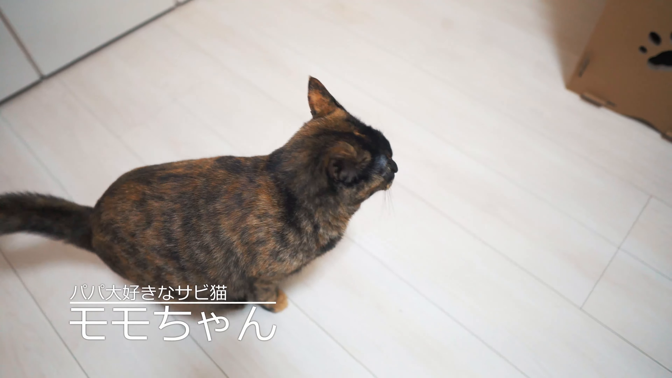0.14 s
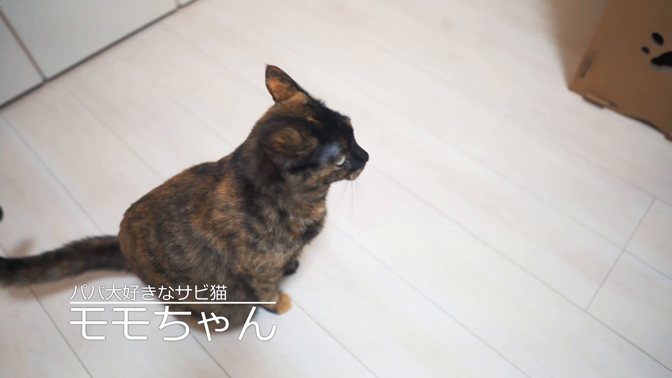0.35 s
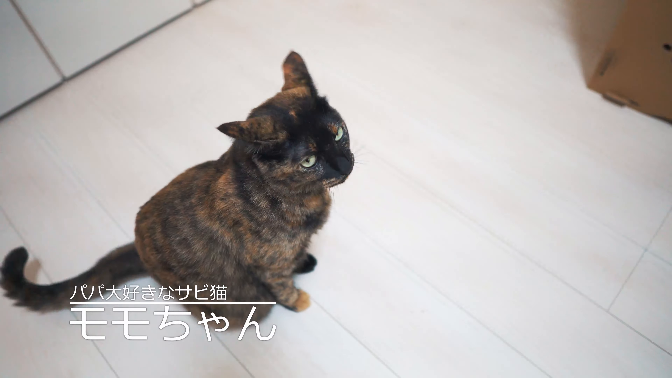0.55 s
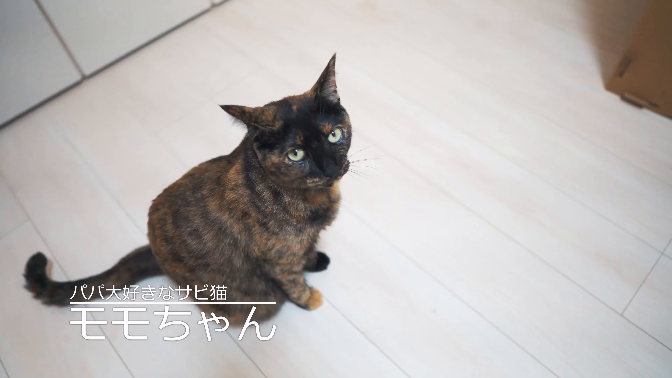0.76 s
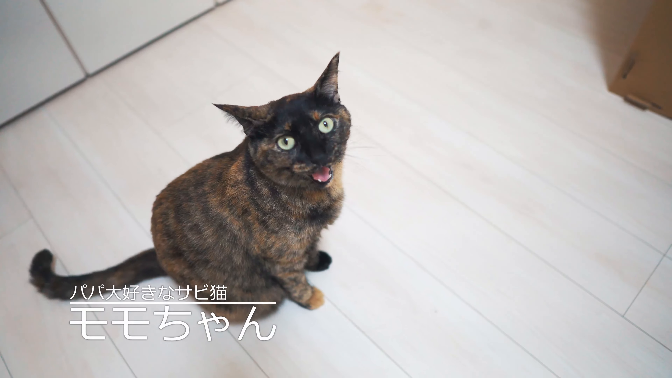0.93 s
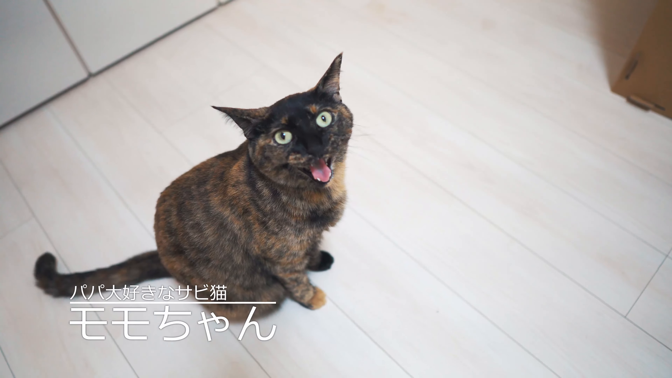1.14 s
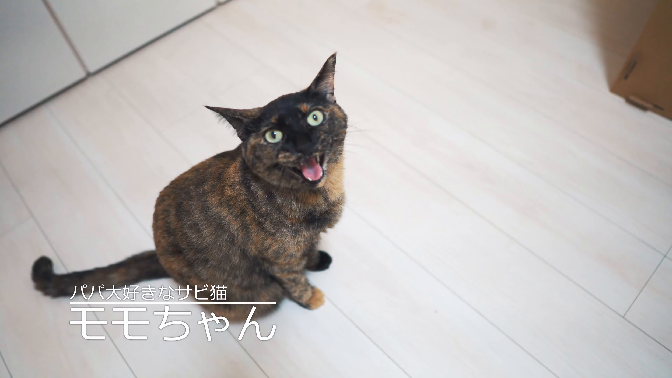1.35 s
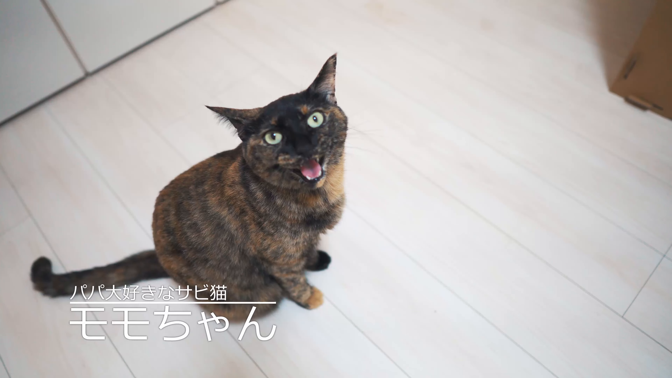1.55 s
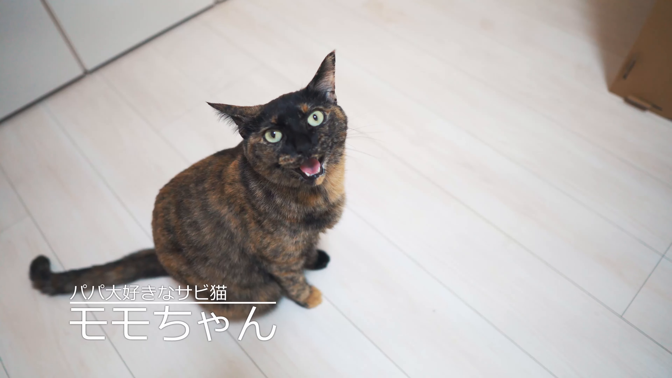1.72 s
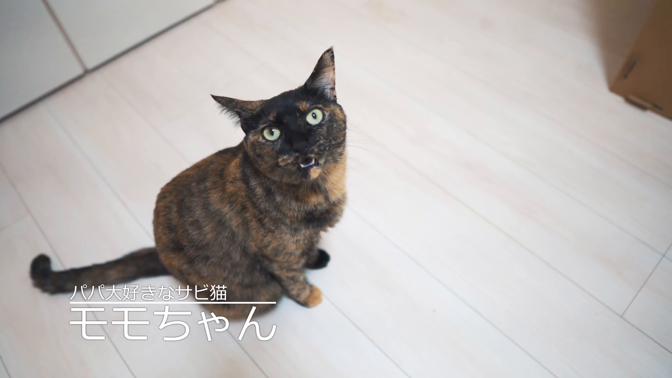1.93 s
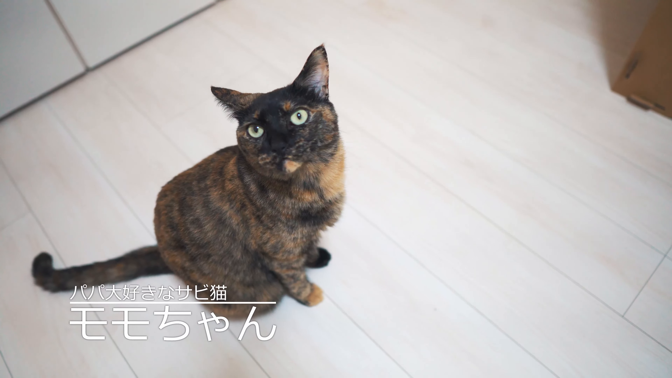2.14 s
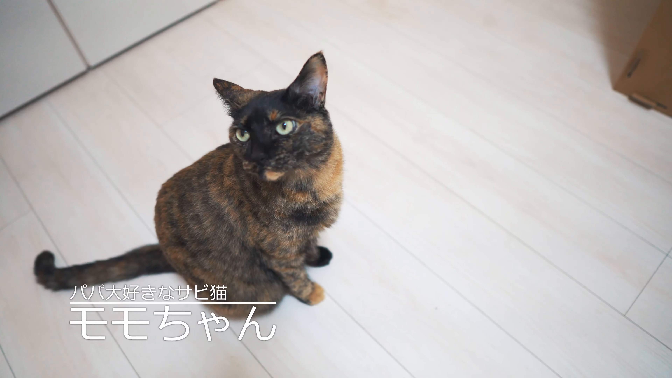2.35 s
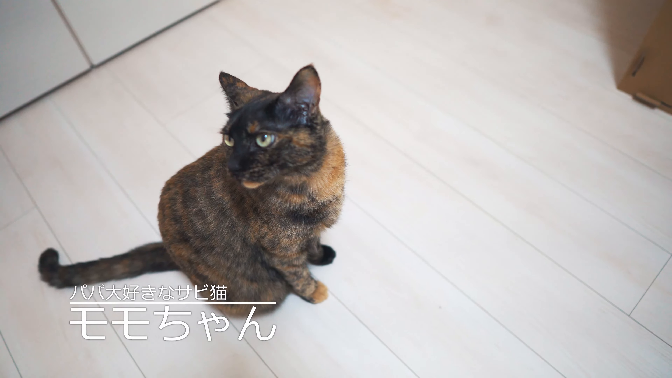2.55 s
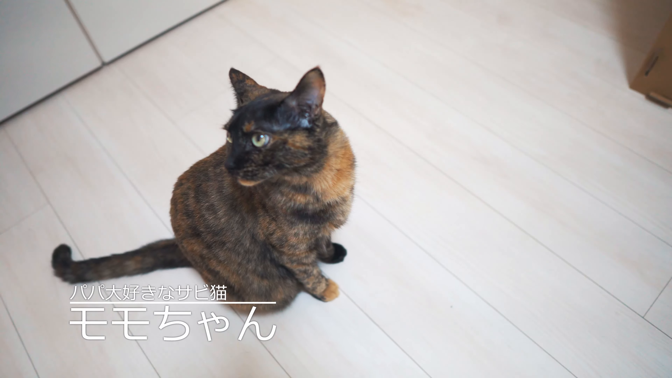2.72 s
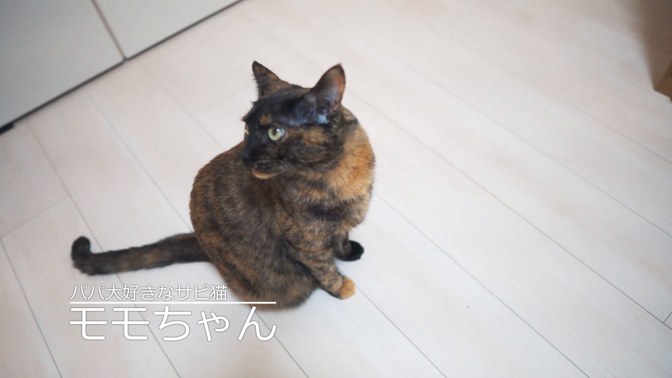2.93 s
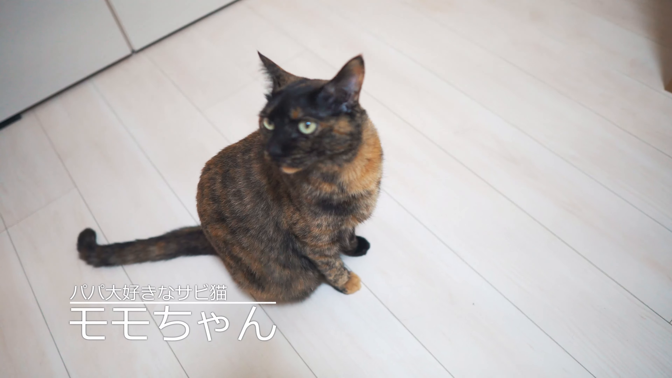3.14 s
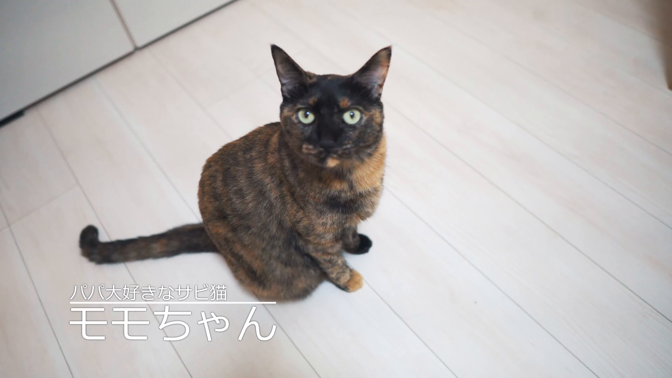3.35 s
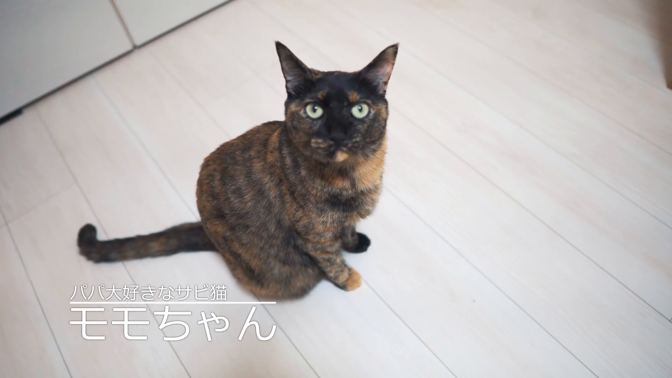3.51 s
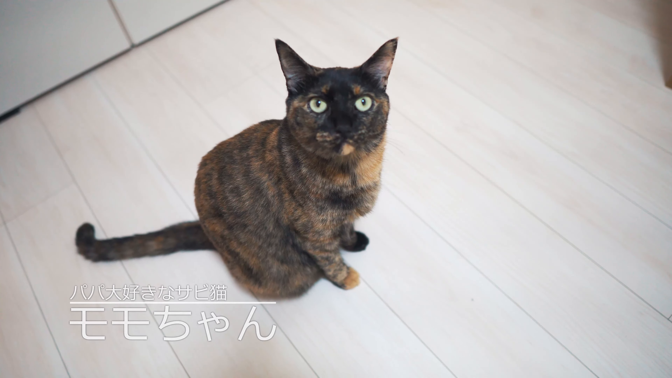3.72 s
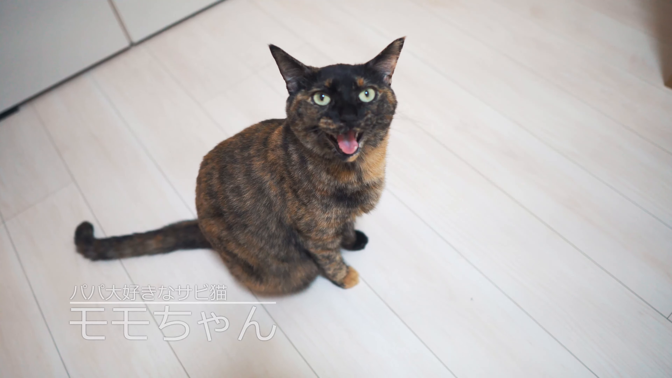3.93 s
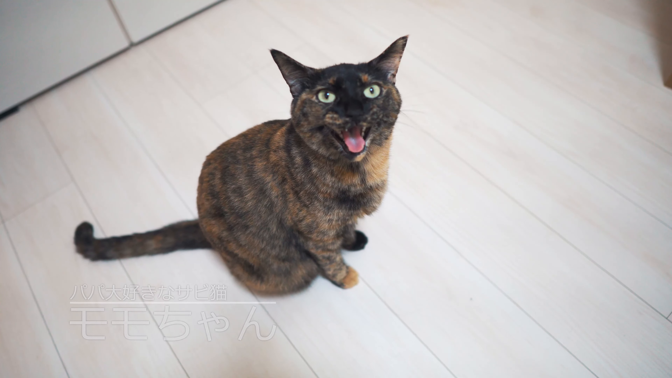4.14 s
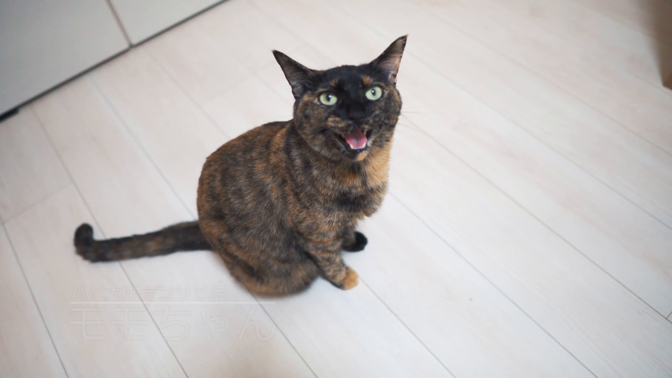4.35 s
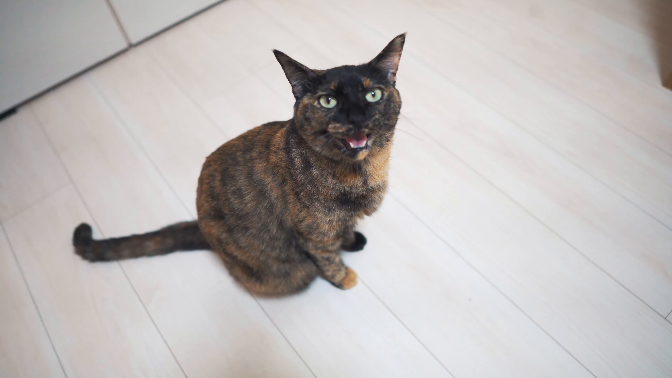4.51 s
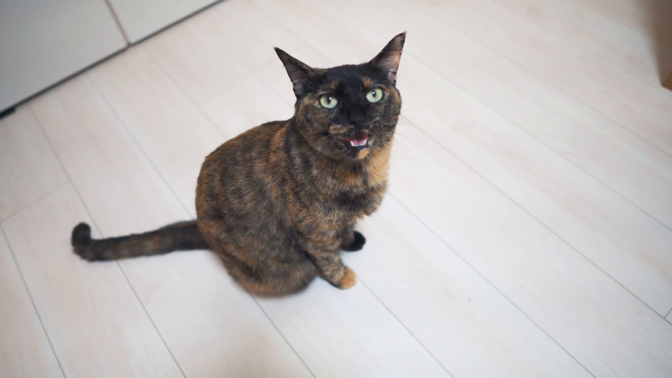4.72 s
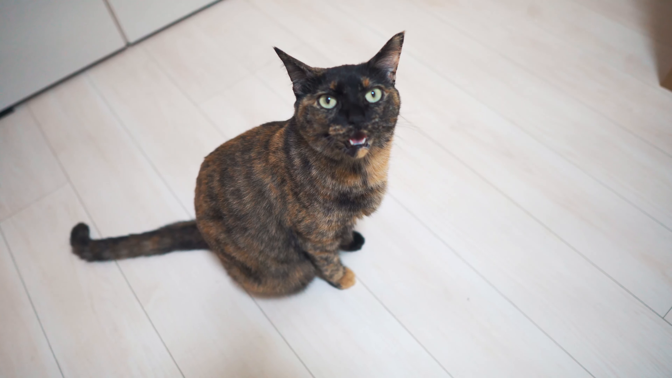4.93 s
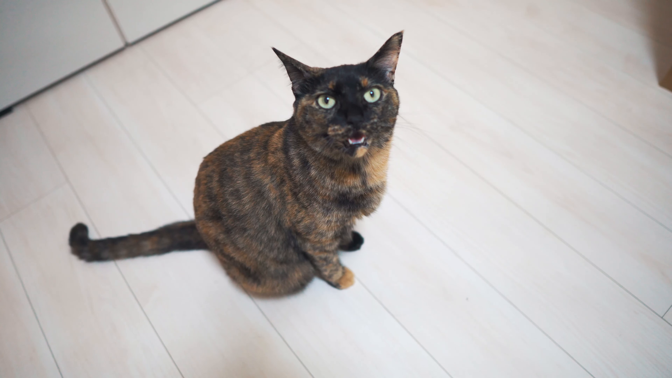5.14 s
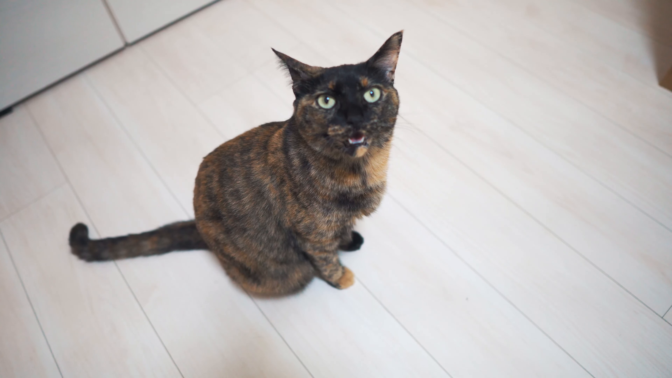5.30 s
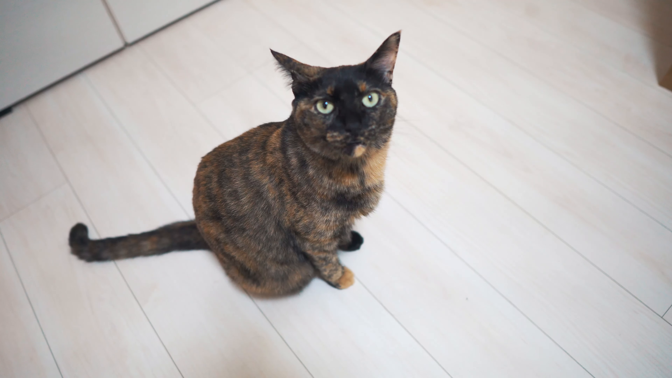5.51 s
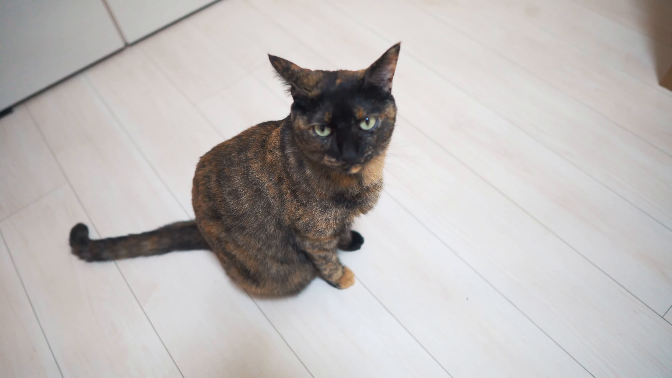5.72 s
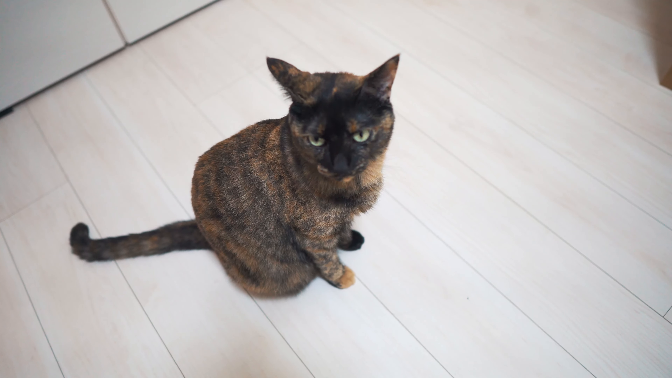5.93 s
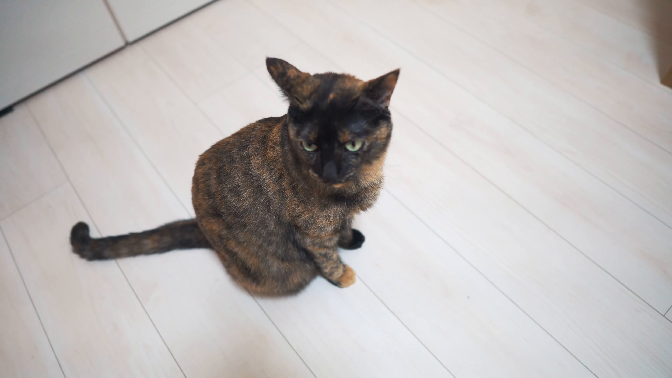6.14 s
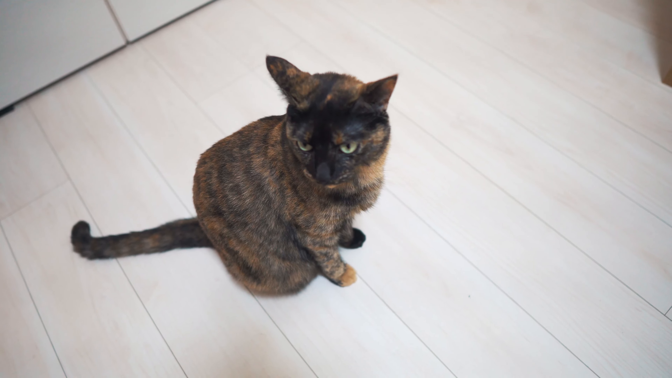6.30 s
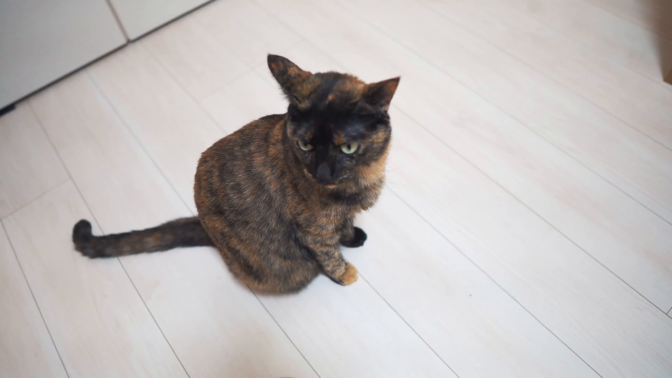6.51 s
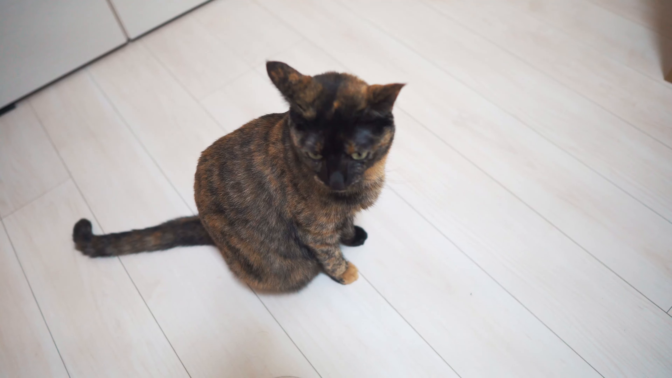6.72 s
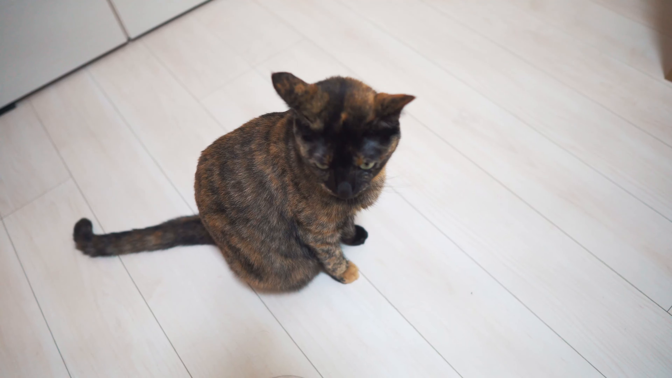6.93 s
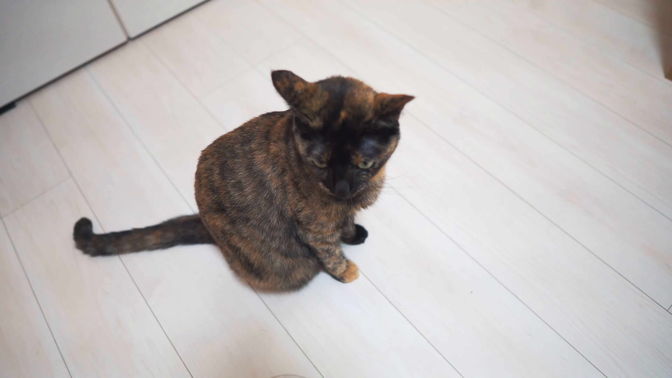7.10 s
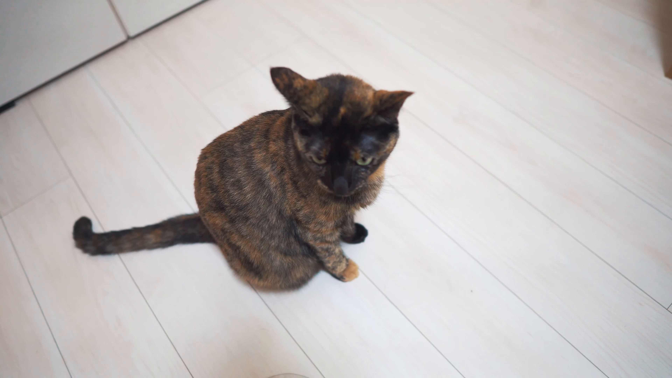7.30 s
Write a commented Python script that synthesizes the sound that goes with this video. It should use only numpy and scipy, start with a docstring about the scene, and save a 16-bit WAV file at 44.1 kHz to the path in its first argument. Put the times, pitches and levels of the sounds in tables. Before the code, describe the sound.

A cat gives two long meows close by indoors, each starting high and sinking in pitch, over a low room hush.

```python
'''A cat gives two long meows on a wooden floor, close to the microphone.
Vocal-fold partials pass through the moving mouth: each meow starts high, sinks in pitch as the mouth
widens, and ends in a short rasp as it closes. Tongue and lips tick; the throat catches.
The room adds a slight ring and a low hush; a soft sub-bass rumble lies beneath, throbbing at first.'''
import sys
import numpy as np
from scipy import signal
from scipy.fft import rfft, irfft, next_fast_len
from scipy.io import wavfile

SR = 44100
rng = np.random.default_rng(int(sys.argv[2]) if len(sys.argv) > 2 else 0)


def to_wav(sig):
    """Store sig (one row per channel, or 1-D mono) as 16-bit WAV at the path in sys.argv[1].

    Samples outside -1..1 are clipped; the rate is SR.
    """
    pcm = np.clip(np.atleast_2d(sig), -1, 1) * 32767
    pcm = np.round(pcm).astype(np.int16)
    wavfile.write(sys.argv[1], SR, pcm.T)  # frames by channels


N = 324600

# The meows. Each row: start in seconds, end in seconds, main resonance in Hz, base gains in dB of the
# jaw, upper and front resonances, closing hiss in dB.
MEOWS = [(0.959, 2.016, 2466, -39.5, 2.5, -6.6, -47.5), (3.937, 5.376, 2420, -11.5, -3, -2.5, -38)]
# Mouth motion, one curve a meow. Each row: time in seconds, opening (0 nearly shut, 1 wide),
# treble offset in dB.
MOUTH = [
    [(.96, 0.52, -13.5), (1.02, 0.64, -13), (1.12, 0.66, 9), (1.24, 0.7, -1), (1.33, 0.74, 4.5),
     (1.41, 0.79, -0.5), (1.58, 0.78, 5), (1.79, 0.79, -3.5), (1.87, 0.3, 3), (2.0, 0.071, 8)],
    [(3.94, 0.63, -8), (4.0, 0.75, -14.5), (4.1, 0.9, -5.5), (4.24, 1, -1), (4.4, .99, 4.5),
     (4.66, 0.9, 1.5), (4.8, 0.56, -3.5), (5.02, 0.39, -4.7), (5.39, .03, 13)],
]


def from_db(db):
    """Decibels to gain."""
    return 10 ** (np.asarray(db) / 20)


def unit_rms(x):
    """Scale to rms 1."""
    return x / np.sqrt(np.mean(np.abs(x) ** 2) + 1e-20)


def curves_at(rows, t):
    """Each column of a curve table at times t."""
    times_s, *columns = np.transpose(rows)
    return [np.interp(t, times_s, column) for column in columns]


def drift(t, rate_hz, step=8, run_in=2000):
    """Smooth random motion, rms 1."""
    pole = np.exp(-2 * np.pi * rate_hz * step / SR)
    white = rng.standard_normal(len(t) // step + run_in + 2)
    slow = signal.lfilter([1], [1, -2 * pole, pole * pole], white)[run_in:]
    return np.interp(np.arange(len(t)) / step, np.arange(len(slow)), unit_rms(slow))


def resonance(hz, centre_hz, half_width_hz, db):
    """Gain of a peak with steep skirts."""
    return from_db(db) / (1 + ((hz - centre_hz) / half_width_hz) ** 2)


def noise(colour, envelope, modes=()):
    """Noise with an rms envelope. Each colour row: frequency in Hz, relative level in dB."""
    size = next_fast_len(len(envelope) + SR // 4, True)
    hz = np.maximum(np.arange(size // 2 + 1) * SR / size, 1)
    points_hz, points_db = np.transpose(colour)
    gain = from_db(np.interp(np.log(hz), np.log(points_hz), points_db))
    gain = unit_rms(gain * (1 + sum(resonance(hz, *mode) for mode in modes)))
    white = envelope * rng.standard_normal(len(envelope))
    return irfft(rfft(white, size) * gain, size)[:len(envelope)]


def burst(t, start_s, db, decay_s):
    """Envelope: jump, then decay."""
    return from_db(db) * (t >= start_s) * np.exp(-np.abs(t - start_s) / decay_s)


def swell(t, centre_s, db, half_s):
    """Envelope: bell curve."""
    return from_db(db) * np.exp(-((t - centre_s) / half_s) ** 2)


def held(age_s, db, hold_s):
    """Envelope: hold, then fade."""
    return from_db(db) * np.exp(-(age_s / hold_s) ** 4)


def room_hush(t):
    """Low noise coloured by room modes."""
    # Each row: time in seconds, level in dB.
    hush_level = [(0, -37), (.93, -37.5), (1.35, -43.5), (2.3, -40.5), (3.92, -37.5), (4.15, -41),
                  (5.0, -37), (7.36, -35.5)]
    # Each row: frequency in Hz, relative level in dB.
    hush_colour = [(29, -47.5), (50, -12), (75, -12), (128, -14.5), (239, 1), (319, -9.5), (437, -5.5),
                   (470, -10), (690, -7.5), (1060, -15.5), (1230, -16.5), (3220, -24.5), (4520, -30.5),
                   (5480, -30), (15800, -55)]
    # Each row: centre in Hz, half width in Hz, added gain in dB.
    room_modes = [(79.5, 8.3, -0.5), (264, 28, -15), (176, 29, -12), (484, 36, 0), (5570, 300, -10),
                  (8750, 300, -4.5)]
    level_db, = curves_at(hush_level, t)
    return noise(hush_colour, from_db(level_db), room_modes)


def rumble(t, sway_hz=10.5):
    """Sub-bass, stronger at first as the microphone is moved; a throb, perhaps its mount swaying."""
    # Each row: frequency in Hz, relative level in dB.
    rumble_colour = [(3, -3.5), (8, -2), (16, -2), (26, -1.5), (38, -5.5), (55, -16.5), (130, -24.5),
                     (220, -67.5)]
    handling = held(t, db=-36, hold_s=.5)
    sway = np.sqrt(2) * held(t, db=-25.5, hold_s=1.0) * np.sin(2 * np.pi * sway_hz * t)
    return noise(rumble_colour, from_db(-50) + handling) + sway


def wet_ticks(t, decay_s=0.004):
    """Tongue and lips tick: a body plus a thin high snap."""
    # Each row: start in seconds, body level in dB, snap level in dB.
    ticks = [(.833, -51, -62), (.907, -57, -57), (1.271, -44, -70), (1.313, -45, -63), (1.446, -43, -72),
             (1.871, -44, -74), (1.991, -45, -65), (3.80, -57, -66)]
    # Body and snap spectra. Each row: frequency in Hz, relative level in dB.
    body_colour = [(400, -45), (1500, -13), (3000, -7.5), (5300, 3), (7000, -8), (10000, -24.5),
                   (15000, -19)]
    snap_colour = [(4000, -26), (9000, -4), (14000, -5.5), (16000, -8)]
    bodies = sum(burst(t, start_s, db, decay_s) for start_s, db, _ in ticks)
    snaps = sum(burst(t, start_s, db, decay_s) for start_s, _, db in ticks)
    return noise(body_colour, bodies) + noise(snap_colour, snaps)


def hoarseness_db(t, start_s, end_s, clear_db=-41.5, break_up_db=-0.5, break_up_s=.021):
    """Flutter re a partial at 3 kHz: the folds start roughly, strain, crack, clear, and break up."""
    # Voice cracks. Each row: centre in seconds, flutter in dB, half length in seconds.
    cracks = [(1.222, -29.5, 0.021), (1.32, -19.5, 0.016), (1.381, -27, 0.0097), (4.241, -27, .05)]
    onset = burst(t, start_s, db=-10, decay_s=.009)
    strain = held(t - start_s, db=-24.5, hold_s=.47)
    cracking = sum(swell(t, *row) for row in cracks)
    break_up = from_db(break_up_db) * np.exp((t - end_s) / break_up_s)
    return 20 * np.log10(from_db(clear_db) + onset + strain + cracking + break_up)


def closure(t, mouth):
    """Mouth closure, 0 to 1."""
    opening, _ = curves_at(mouth, t)
    return 1 - np.clip(opening, 0, 1)


def vocal_tract(hz, t, pitch_hz, call, mouth, settled_hz=615, roll_off_hz=6500, lips_full_db=-28):
    """Complex gains at hz, unit total power. Two resonances follow pitch; high ones fade on closing."""
    # Fixed-pitch resonances of throat, mouth front, treble, and nose and lips.
    # Each row: centre in Hz, half width in Hz, base gain in dB.
    throat = [(697, 260, -30), (1750, 115, -11)]
    front = [(4570, 100, -30), (5334, 223, -24.5)]
    treble = [(7100, 330, -53.5), (9706, 440, -44), (13636, 1217, -41)]
    lips = [(625, 160, -35), (6300, 130, -40.5), (8360, 356, -55.5)]
    _, _, main_hz, jaw_db, upper_db, front_db, _ = call
    _, treble_db = curves_at(mouth, t)
    shut = closure(t, mouth)
    raised_hz = pitch_hz - settled_hz
    upper_db = upper_db - 39 * shut
    # Moving resonances, same columns.
    jaw = (1154, 49, jaw_db - 2.5 * shut)
    main = (main_hz + 2.18 * raised_hz - 143 * shut, 102.6, 0)
    upper = (3210 + 5.26 * raised_hz + 477 * shut, 266, upper_db)
    peaks = [jaw, main, upper, *throat]
    peaks += [(centre, width, db + front_db + treble_db - 4.5 * shut) for centre, width, db in front]
    peaks += [(centre, width, db + treble_db - 28.6 * shut) for centre, width, db in treble]
    gain = sum(resonance(hz, *peak) for peak in peaks)
    # The lips take over as the upper resonance fades.
    lip_share = np.clip(upper_db / lips_full_db, 0, 1) ** 2
    gain += lip_share * sum(resonance(hz, *peak) for peak in lips)
    gain /= np.hypot(1, (hz / roll_off_hz) ** 2)
    lag_rad = sum(np.arctan((hz - centre) / width) for centre, width, _ in peaks)
    return gain / np.linalg.norm(gain, axis=0) * np.exp(-1j * lag_rad)


def meow(call, mouth, pitch, loudness, overshoot_hz, settle_s=.0045, attack_s=.0045, release_s=.026,
         waver_db=2.07, flutter_hz=220, rasp_db=-4, partials=26, hop=32):
    """Vocal-fold partials through the moving mouth; hoarseness adds jitter, flutter and rasp."""
    start_s, end_s, *_ = call
    span = np.arange(int(start_s * SR), int(end_s * SR))
    t = span / SR
    pitch_hz = curves_at(pitch, t)[0] + overshoot_hz * np.exp(-(t - start_s) / settle_s)
    level_db, = curves_at(loudness, t)
    hoarse = from_db(hoarseness_db(t, start_s, end_s))
    jitter = (0.0016 + 0.025 * hoarse) * drift(t, rate_hz=45)
    phase = 2 * np.pi * np.cumsum(pitch_hz * (1 + jitter)) / SR
    orders = np.arange(1, partials + 1)
    gains = vocal_tract(orders[:, None] * pitch_hz[::hop], t[::hop], pitch_hz[::hop], call, mouth)
    voice = np.zeros(len(t))
    for order, coarse_gain in zip(orders, gains):
        gain = np.interp(t, t[::hop], coarse_gain)
        # Turbulence roughens high partials most.
        depth = hoarse * order * pitch_hz.mean() / 3000
        turbulence = (drift(t, flutter_hz) + 1j * drift(t, flutter_hz)) / np.sqrt(2)
        flutter = (1 + depth * turbulence) / np.hypot(1, depth)
        # Partials between resonances waver most.
        waver = from_db(waver_db * (1 - np.abs(gain) ** 2) * drift(t, rate_hz=21.7))
        voice += np.real(gain * waver * flutter * np.exp(1j * order * phase))
    # Turbulence at each fold opening. Each row: frequency in Hz, relative level in dB.
    rasp_colour = [(150, -59.5), (500, -25), (780, -11.5), (1600, -22), (2200, -18), (2700, -1.5),
                   (3500, 7.5), (4500, 0.5), (5500, -2), (7000, -25), (15000, -51.5)]
    folds_open = (1 + np.cos(phase)) / 2
    voice += noise(rasp_colour, hoarse * from_db(rasp_db) * folds_open)
    ramp = np.clip((t - start_s) / attack_s, 0, 1) * np.clip((end_s - t) / release_s, 0, 1)
    gate = np.sin(np.pi / 2 * ramp) ** 2
    out = np.zeros(N)
    out[span] = np.sqrt(2) * voice * gate * from_db(level_db)
    return out


def cat_voice():
    """Two meows; the second starts sharp and drops onto its pitch at once."""
    # Vocal-fold pitch, one curve a meow. Each row: time in seconds, pitch in Hz.
    pitch = [
        [(0.965, 686), (0.973, 679), (1.001, 704.4), (1.197, 679), (1.415, 629.8), (1.597, 613.2), (1.665, 618),
         (1.677, 612.3), (1.939, 623.2), (1.99, 620)],
        [(3.95, 709), (3.96, 704), (4.016, 694.2), (4.196, 620), (4.256, 610.4), (4.282, 598.6), (4.428, 598),
         (4.514, 588.9), (4.852, 608), (4.95, 621.4), (5.084, 628), (5.108, 638.3), (5.15, 632), (5.284, 626.3),
         (5.36, 599.3)],
    ]
    # Voice level, one curve a meow. Each row: time in seconds, level in dB.
    loudness = [
        [(0.965, -16.5), (1.037, -12.5), (1.143, -14), (1.443, -11.5), (1.813, -11.5), (1.957, -22), (2.0, -38)],
        [(3.945, -21.5), (4.003, -13.5), (4.195, -11.5), (4.491, -14), (4.543, -12.5), (4.587, -15.5),
         (4.915, -18.5), (5.015, -19), (5.043, -22), (5.307, -23.5), (5.38, -30.5)],
    ]
    overshoot_hz = [0, 190]
    return sum(meow(*controls) for controls in zip(MEOWS, MOUTH, pitch, loudness, overshoot_hz))


def throat_catches(t):
    """The throat catches as the voice starts and stops."""
    # Each row: start in seconds, level in dB, decay in seconds.
    catches = [(0.96, -21, 0.006), (1.992, -30, 0.017), (3.94, -20, 0.0061), (5.367, -27, 0.013)]
    # Each row: frequency in Hz, relative level in dB.
    catch_colour = [(120, -53), (300, -18.5), (600, -4), (780, 2), (1100, -11), (1700, -16), (2600, -1),
                    (3600, -18.5), (5500, -11), (8000, -44), (15000, -51)]
    return noise(catch_colour, sum(burst(t, *row) for row in catches))


def closing_hiss(t, narrow_db=-58, puff_lead_s=.02):
    """Air hisses through the narrowing mouth, with a puff just before the voice stops."""
    # Each row: frequency in Hz, relative level in dB.
    hiss_colour = [(2000, -25), (4200, -18), (5000, -4.5), (5480, 5.5), (6100, -9), (7200, -30),
                   (11000, -39.5), (13800, -26.5), (15500, -41.5)]
    envelope = np.zeros(N)
    for (start_s, end_s, *_, puff_db), mouth in zip(MEOWS, MOUTH):
        voiced = (t > start_s) & (t < end_s)
        envelope += from_db(narrow_db) * closure(t, mouth) ** 4 * voiced
        envelope += swell(t, end_s - puff_lead_s, puff_db, half_s=.022)
    return noise(hiss_colour, envelope)


def room_ring(x, level_db=-12.5, first_echo_s=0.0098, t60_s=0.29):
    """Dense, evenly decaying reflections from floor and walls."""
    t = np.arange(SR // 2) / SR
    echoes = rng.standard_normal(len(t)) * from_db(-60 * t / t60_s) * (t > first_echo_s)
    return from_db(level_db) * signal.fftconvolve(x, echoes / np.linalg.norm(echoes))[:N]


def scene():
    """The cat and its reflections over hush and rumble, mono."""
    t = np.arange(N) / SR
    cat = cat_voice() + closing_hiss(t) + wet_ticks(t) + throat_catches(t)
    return (cat + room_ring(cat) + room_hush(t) + rumble(t))[None]


def record(dry):
    """Steep low-pass."""
    cutoff_hz = 15750
    return signal.sosfilt(signal.ellip(12, .1, 90, cutoff_hz, fs=SR, output="sos"), dry)


dry = scene()
out = record(dry)
to_wav(out)
```